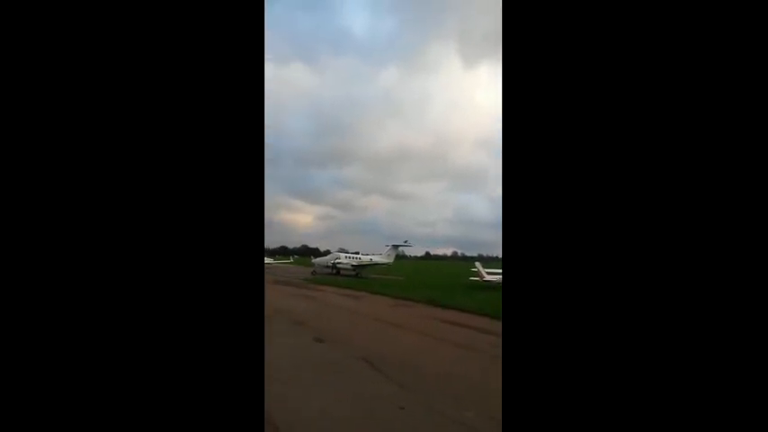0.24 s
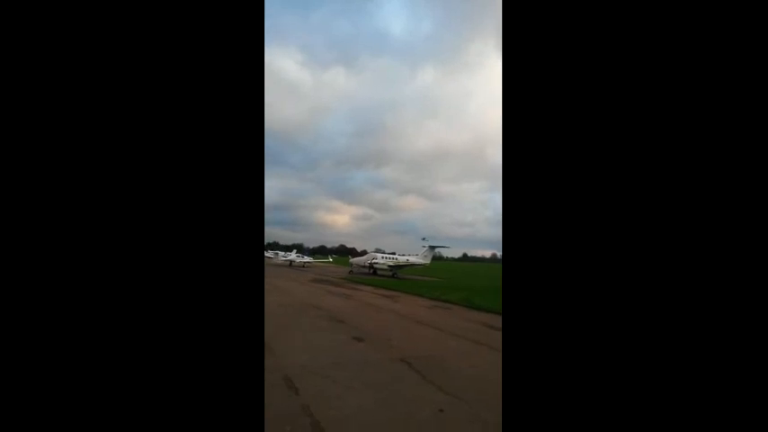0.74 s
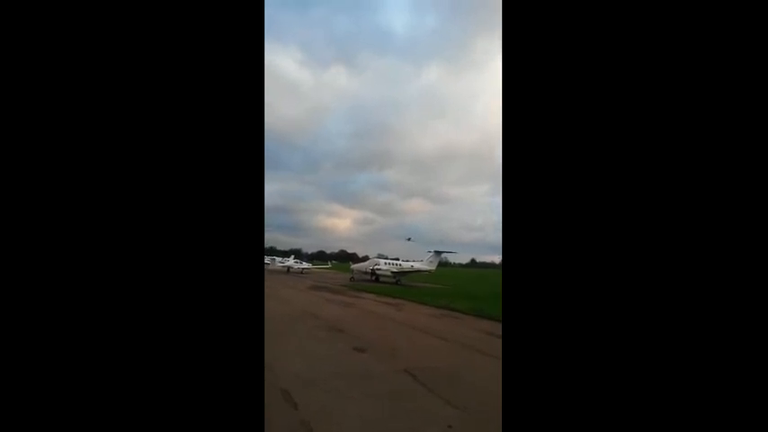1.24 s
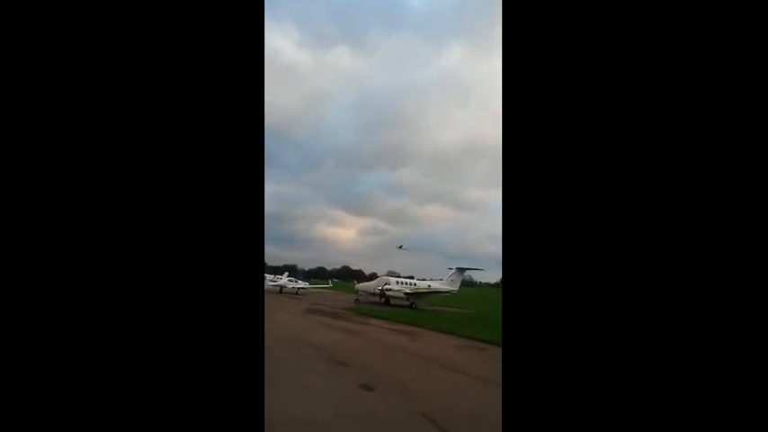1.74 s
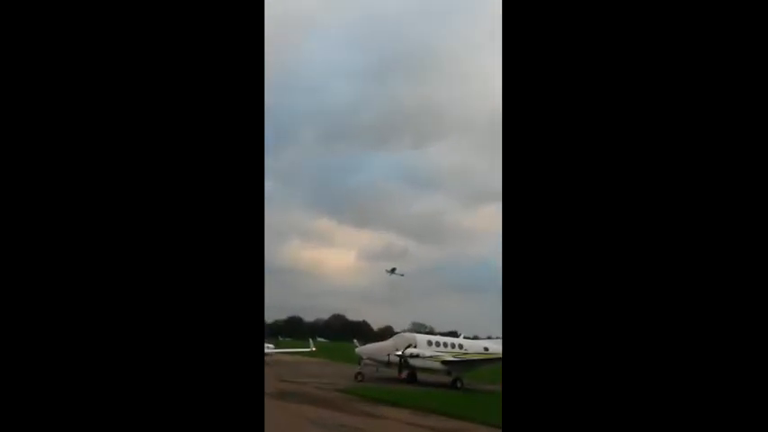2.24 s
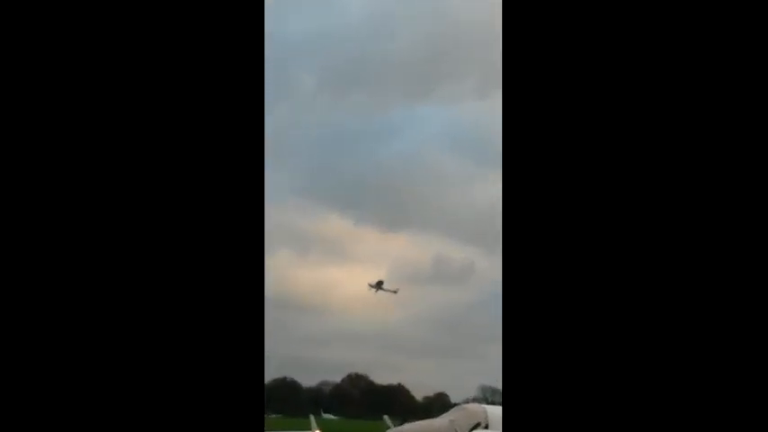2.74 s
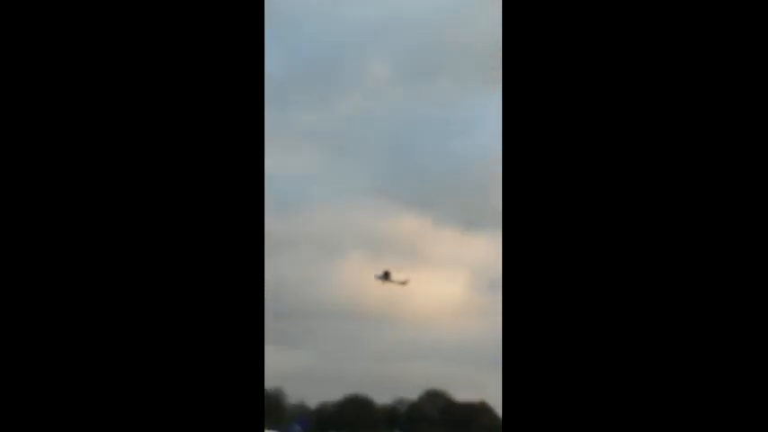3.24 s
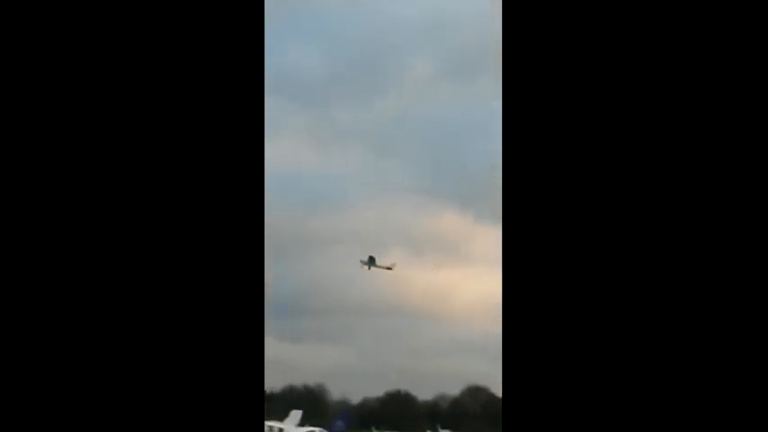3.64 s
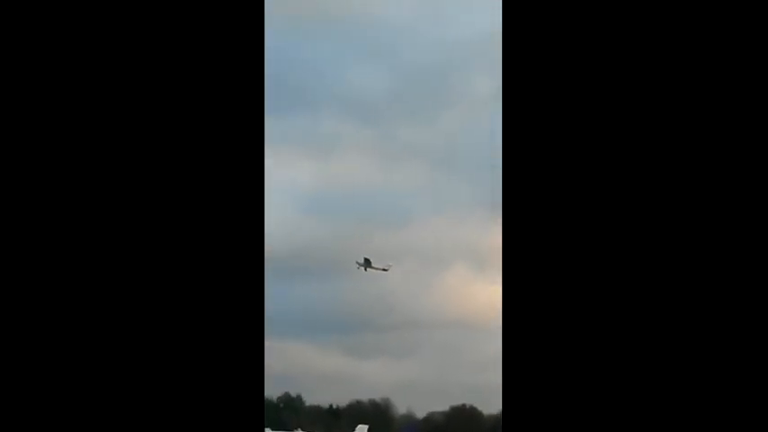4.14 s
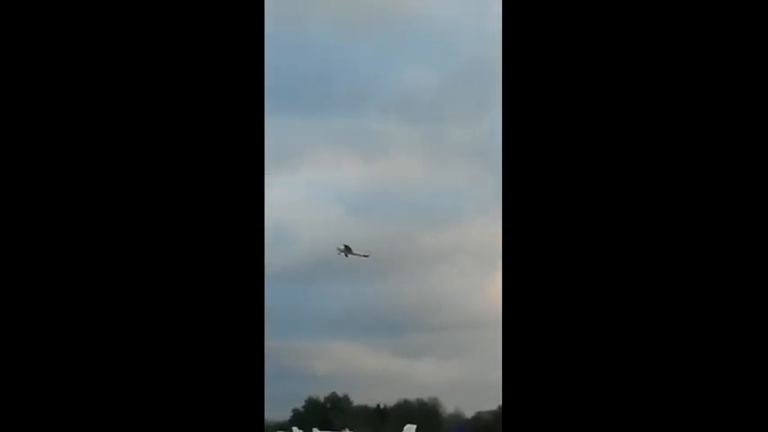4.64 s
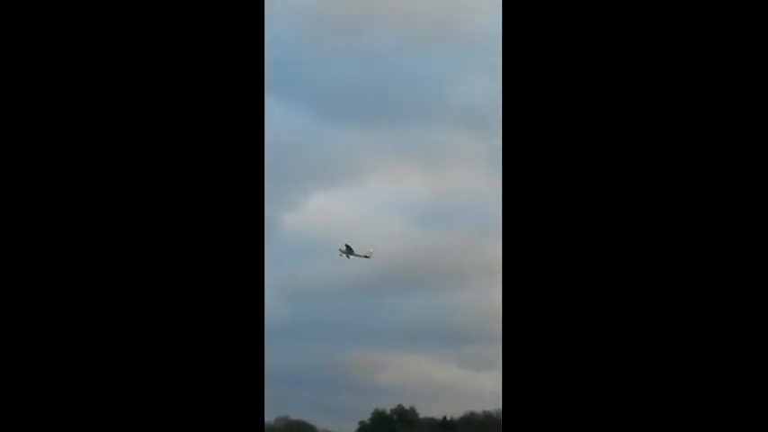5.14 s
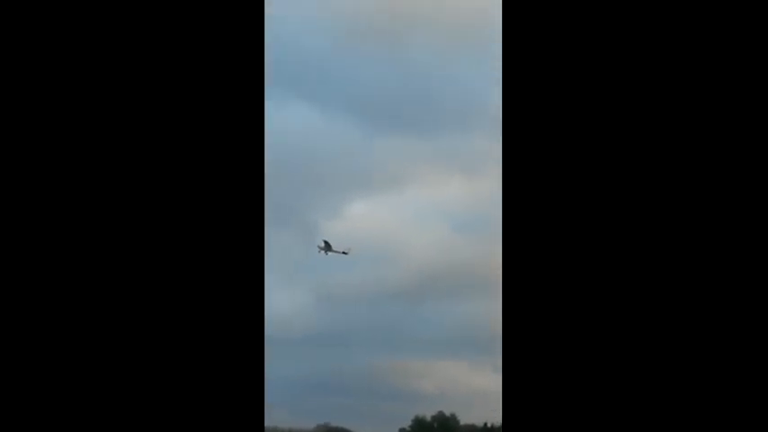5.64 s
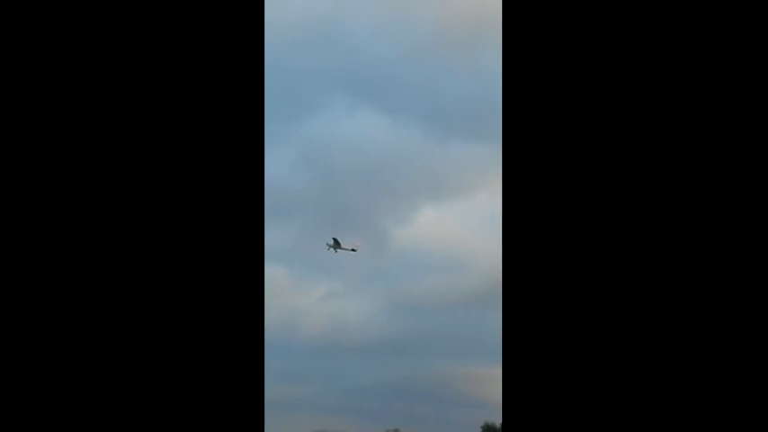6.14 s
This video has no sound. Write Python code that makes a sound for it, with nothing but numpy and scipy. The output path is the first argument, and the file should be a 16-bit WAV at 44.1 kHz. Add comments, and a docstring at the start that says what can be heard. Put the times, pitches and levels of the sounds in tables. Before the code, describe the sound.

A light propeller aeroplane drones closer over a windy airfield, its buzzing engine swelling and sinking slightly in pitch, with idling rumble and microphone ticks.

```python
"""Light aeroplane passing an airfield

A two-blade, four-cylinder aeroplane is heard at two ports as orders of one rotation, pulsing noise bands
and a ringing crack at each firing; its pitch sinks as it draws level.
Another engine idles on the ground as steady orders over rumble, beside a thin whine of filtered noise
and a faint top-treble noise that flickers about twelve times a second.
Wind puffs on the right port as low noise and decaying pops; a finger ticks there, ringing cavity and case.
A limiter ducks both channels ahead of the loudest peaks.
"""
import sys
import numpy as np
from scipy import signal
from scipy.fft import rfft, irfft, next_fast_len
from scipy.io import wavfile
from scipy.ndimage import uniform_filter1d, minimum_filter1d

SR = 44100
rng = np.random.default_rng(int(sys.argv[2]) if len(sys.argv) > 2 else 0)


def invert_db(x):
    """Field ratio 10**(x/20) for x, a level in decibels (scalar or array-like)."""
    u = np.asarray(x, float) / 20
    return 10 ** u


def int16_out(signal):
    """Quantize to a 16-bit WAV file."""
    q = np.round(np.clip(np.atleast_2d(signal).T, -1, 1) * 32767)
    wavfile.write(sys.argv[1], SR, q.astype(np.int16))


N = 282224
TIME_S = np.arange(N) / SR

# Blade and firing rate, sinking as the aeroplane draws level. Each row: time in seconds, rate in Hz.
FIRING_RATE = [(0.0, 84.63), (1.0, 84.77), (2.8, 82.58), (4.2, 81.66), (4.9, 81.2), (5.9, 79.65),
               (6.4, 79.04)]
# Orders above the third. Each row: multiple of the firing rate, relative level in dB far off,
# relative level in dB drawing level.
HIGHER_ORDERS = [(4, -7.5, -4.5), (5, -11, -7.5), (6, -4, -5), (7, -3, -4.5), (8, -10, -5.5), (9, -10, -8),
                 (10, -13, -11), (11, -17, -15), (12, -17, -16), (13, -20, -18), (14, -20, -16),
                 (15, -22, -17)]
# Quarter orders of unequal cylinders. Each row: quarters of the firing rate, dB relative to the higher orders.
QUARTER_ORDERS = [(5, -15), (7, -12), (9, -18), (10, -9.5), (11, -4), (13, -11), (17, -37)]
IDLE_CYCLE_HZ = 10.03
# Orders of the idling engine. Each row: multiple of the cycle, relative level in dB.
IDLE_ORDERS = [(4, -28), (7, -34), (12, 1), (13, -35), (14, -4.5), (15, -5.5), (16, -7), (20, -12),
               (27, -47), (30, -32), (31, -24), (33, -47), (52, -14)]
# Noise spectrum of the idling engine. Each row: frequency in Hz, relative density in dB per Hz.
RUMBLE_SPECTRUM = [(25, -14), (50, -7.5), (90, 1), (150, 6.5), (280, -7.5), (400, -7.5), (600, -51)]
# Noise spectrum of the aeroplane's roar. Each row: frequency in Hz, relative density in dB per Hz.
ROAR_SPECTRUM = [(200, -8.5), (300, -1), (400, -16.5), (560, -0.5), (800, -5.5), (1200, -3), (1500, -18.5),
                 (1900, -30)]
# Noise spectrum of its rasp. Each row: frequency in Hz, relative density in dB per Hz.
RASP_SPECTRUM = [(1100, 5), (1500, 4), (2000, 6.5), (2600, 4.5), (3200, -2.5), (4200, -5.5), (5500, -30)]
# Noise spectrum of its hiss. Each row: frequency in Hz, relative density in dB per Hz.
HISS_SPECTRUM = [(3000, -1.5), (4200, -5.5), (5500, 1), (6800, 1.5), (8100, 3), (9300, -6), (10500, -5.5),
                 (11600, -6.5), (12300, -22), (14500, -40)]
# Noise spectrum of the wind puffs. Each row: frequency in Hz, relative density in dB per Hz.
PUFF_SPECTRUM = [(15, -44), (25, -1.5), (140, 4), (226, -10.5), (271, -8), (515, -20), (785, -60),
                 (2000, -59), (2600, -79), (4400, -120)]
# Finger ticks at the right port. Each row: first touch in seconds, relative cavity drive in dB,
# relative case knock in dB.
TICKS = [(0.6627, -23.5, -50), (0.757, -31, -54), (0.7655, -24, -51), (0.768, -12, -41),
         (0.7693, -7.5, -38), (0.854, -22.5, -39), (0.9084, -5.5, -34), (0.941, -31.5, -45),
         (1.03, -18.5, -58), (3.2174, -27, -30.5), (3.218, -18, -38), (3.3641, -6.5, -28.5),
         (3.514, -5, -50), (3.522, -6, -36), (3.545, -39, -44), (3.9049, -18, -48)]
# Modes of the port cavity. Each row: frequency in Hz, relative level in dB, 60 dB decay time in seconds.
PORT_MODES = [(8130, 5, 0.0017), (13300, -22, 0.0009)]
# Likeness of the noise at the two ports. Each row: frequency in Hz, shared fraction of the power.
LIKENESS = [(60, 1), (500, .98), (1000, .74), (2000, .64), (4000, .6), (8000, .55), (12000, .6)]
# Level balance of the ports. Each row: frequency in Hz, left minus right in dB.
BALANCE_DB = [(60, -3.5), (140, -1), (350, -2), (850, -3.5), (2040, 3), (4940, 2.5), (11900, -2.5)]
# Phase difference of the ports. Each row: frequency in Hz, angle in radians (left ahead, save in crest()).
LEAD = [(60, -.06), (200, -.16), (950, -.3), (1800, 1.9), (2150, .8), (2500, -.8), (3200, -1.8), (3700, 0),
        (5000, 1.6), (6500, 2.1), (7200, .4), (8700, -2.1)]
# Band of the roar where direct and ground paths add up best. Each row: time in seconds, centre in Hz.
CREST_CENTRE = [(0.0, 998), (1.0, 988), (1.3, 818), (1.7, 990), (2.2, 1061), (3.56, 1048), (4.55, 950),
                (4.75, 842), (5.25, 812.3), (5.5, 1055), (6.0, 1200), (6.4, 1135)]
# Modes of the case. Each row: frequency in Hz, relative level in dB, 60 dB decay time in seconds.
CASE_MODES = [(6000, 4, 0.0022), (4170, 13.5, 0.0019), (2830, 13.5, 0.0022), (1700, 7.5, 0.0059),
              (1200, 7, 0.02)]
# Eddies that pop on the right port. Each row: start in seconds, relative level in dB, frequency in Hz.
POPS = [(0.838, -22, 172), (0.868, -11, 191), (0.879, -9.5, 176), (1.146, -11, 183), (1.172, -16, 260),
        (1.204, -5, 392), (1.212, -10, 171), (1.2295, -15, 950), (1.23, -8, 330), (1.245, -17, 260),
        (1.25, -10.5, 150), (1.266, -19, 139), (1.275, -16, 700), (1.28, -12, 303), (1.18, -22, 400),
        (1.306, -13.5, 277), (1.319, -11.5, 477), (1.408, -25, 189), (1.413, -18, 513), (1.415, -10, 343),
        (1.429, -20, 149), (1.442, -14, 260), (1.454, -19, 200), (1.547, -17.5, 220), (1.698, -17.5, 170),
        (1.719, -26, 188), (2.204, -14, 268), (2.518, -25, 301)]
# Common swell of the steady noise. Each row: time in seconds, reference level in dB.
SWELL = [(0.0, -55.5), (0.36, -57), (0.66, -54), (0.87, -50), (1.0, -53.5), (1.55, -58), (1.76, -57.5),
         (2.03, -50), (2.3, -45.5), (3.14, -47), (3.55, -50.5), (4.33, -52.5), (4.83, -48), (5.67, -46),
         (5.9, -45), (6.4, -47.5)]
# Pulses reaching the ports. Each row: time in seconds, blade level in dB, exhaust level in dB.
PULSES = [(0.0, -39.5, -35.5), (.32, -40.5, -34.5), (.55, -38, -34.5), (.82, -36.5, -31.5),
          (1.12, -40, -46), (1.44, -40.5, -38), (1.7, -43.5, -37), (1.95, -32, -35.5), (2.24, -27.5, -33.5),
          (2.4, -28, -35), (2.56, -26, -34), (2.72, -25.5, -31), (3.04, -25, -29.5), (3.2, -23, -27.5),
          (3.36, -24.5, -27.5), (3.68, -32.5, -42.5), (3.84, -33.5, -35.5), (4.0, -34.5, -41.5),
          (4.16, -43, -31), (4.32, -40, -33.5), (4.64, -38.5, -17.5), (4.8, -29, -20.5), (4.96, -31, -15.5),
          (5.12, -26.5, -18), (5.28, -25, -24.5), (5.44, -24.5, -28.5), (5.6, -25, -23), (5.76, -21, -22.5),
          (6.0, -23, -20.5), (6.4, -22, -20.5)]
# The three lowest orders. Each row: dB relative to the blade pulse, dB relative to the exhaust pulse.
LOWEST_ORDERS = [(-0.5, -16), (-20, -1), (-14.5, -15.5)]
# Brief swells and fades of the third order. Each row: middle in seconds, length in seconds, change in dB.
THIRD_SWAYS = [(.55, 0.31, -6.5), (1.847, 0.18, -11), (2.657, 0.15, 3.5), (4.243, 0.56, 9.5),
               (4.901, 0.39, -5.5), (5.53, 0.45, 5.5), (6.35, 0.32, -3.5)]
# Brief flares of the noise. Each row: middle in seconds, length in seconds, roar rise in dB, rasp rise in dB.
FLARES = [(0.023, 0.33, 4, 5), (0.28, 0.11, 1, 3), (0.71, 0.13, 4, 3), (1.27, 0.12, 5, 3),
          (1.707, 0.061, 2, 4.5), (2.17, 0.12, 1, 5), (2.569, 0.098, 1.5, 2.5), (2.962, 0.16, 2, 1.3),
          (3.527, 0.36, 4.5, 1.5), (4.17, 0.51, 5.5, 1.5), (4.414, 0.25, 1, 4), (4.637, 0.17, 4.5, 0.3),
          (4.976, 0.22, 3.5, 3), (5.81, 0.36, 2.5, 3), (6.039, 0.17, 0, 0)]
# Wind puffs on the right port. Each row: middle in seconds, length in seconds, level in dB.
PUFFS = [(0.5, 0.044, -38), (0.576, 0.038, -44), (0.693, 0.043, -32), (0.853, 0.054, -22),
         (0.944, 0.027, -30), (1.05, 0.054, -37), (1.16, 0.082, -28), (1.237, 0.068, -16),
         (1.336, 0.028, -19.5), (1.41, 0.034, -28), (1.428, 0.034, -14), (1.547, 0.017, -23),
         (1.712, 0.045, -24.5), (1.85, 0.18, -34), (2.02, 0.032, -28), (2.189, 0.17, -21.5),
         (2.52, 0.04, -29), (3.203, 0.11, -25.5), (3.882, 0.1, -41), (4.13, 0.056, -30),
         (4.242, 0.051, -24), (4.418, 0.32, -34)]
# Modes of the exhaust stubs. Each row: frequency in Hz, relative level in dB, 60 dB decay time in seconds.
STUB_MODES = [(2430, -5.5, 0.016), (1710, -2, 0.032), (1203, -7, 0.046), (3080, -7.5, 0.029)]
# Phase common to the whole orders, which turns a downward spike into a steep rise and slower fall.
# Each row: time in seconds, phase in radians.
SKEW = [(0, -2.8), (2.6, -2.5), (3.3, -1.5), (5.3, -1.45), (6.4, -1.0)]
# Band where the exhaust growl is strongest. Each row: time in seconds, centre in Hz, rise in dB.
GROWL = [(0, 580, -5.5), (1.5, 563.7, 2.5), (2.2, 559.4, 2), (3.0, 579, 2.5), (3.5, 580, -7),
         (4.2, 564, -5), (4.5, 933, -1), (4.7, 643, -2), (4.93, 822, 10), (5.08, 637, -2), (5.25, 522.3, 9),
         (5.5, 572.5, 7), (5.65, 598, -1.5), (5.8, 665, 9), (5.95, 623, -0.5), (6.1, 502, 3),
         (6.27, 555, 0), (6.4, 547, -7)]
# Runs of firings whose crack stands out in one colour. Each row: middle in seconds, length in seconds,
# frequency in Hz, drive relative to the rasp in dB.
CRACK_RUNS = [(0.063, .1, 2190, 7), (.29, .07, 2300, 5), (0.722, 0.14, 1160, 8), (2.18, .12, 1140, 17),
              (2.601, 0.16, 1110, 6), (2.95, 0.19, 1170, 9), (3.25, .15, 1170, 8), (3.462, 0.05, 960, 13),
              (4.93, 0.056, 1370, 11), (4.597, .12, 2350, -4), (4.82, 0.057, 2240, 10),
              (4.95, 0.15, 2450, -5), (5.05, 0.078, 2150, 9), (5.152, 0.06, 2600, 11),
              (5.229, .07, 2160, 10), (5.256, .09, 2620, 8.5), (5.39, 0.088, 3250, 9),
              (5.39, 0.076, 2180, 7), (5.457, 0.054, 2467, 10), (5.76, 0.079, 2395, 6),
              (5.818, .07, 3120, -2), (5.87, 0.082, 1200, 0), (5.926, 0.057, 2900, 8),
              (5.973, 0.06, 2550, 9), (6.049, 0.051, 2770, 12), (6.038, 0.17, 1220, 10),
              (6.102, 0.045, 2450, -6)]
# Sprays of tiny catches as the fingertip slides. Each row: middle in seconds, length in seconds,
# relative drive in dB.
RUBS = [(0.656, 0.011, -45), (0.757, 0.018, -36), (0.766, .005, -31), (0.855, .01, -41), (3.192, .004, -38),
        (3.521, 0.0058, -40)]

MEAN_PULSE_DB, MEAN_SWELL_DB = -30, -52   # the shares below act about these
# Upper orders follow the pulses and gain as the aeroplane nears.
HIGHER_DB, HIGHER_FOLLOWS, BRIGHTENS_DB_PER_S = -49.5, 0.75, 0.71
# Noise laws: base level in dB at the start, share of the swell, share of the exhaust, trend in dB per second.
ROAR_LAW, RASP_LAW, HISS_LAW = (-44.5, 0.94, 0.0457, 0.1234), (-43.5, 0.63, 0.2652, -0.02), (-42.5, 0.57, 0.2249, 0.22)
IDLE_LAW, WHINE_LAW = (-41.5, 0.99, 0.05, 0.15), (-44, 1.32, 0.04, -1.63)
CALM_DB = -48   # wind between the puffs
BEAT_AT_START, BEAT_PER_S, BEAT_SHARP = 0.4, .13, 0.35   # relative pulsing depth, its growth, second harmonic
UPPER_CREST, UPPER_CREST_DB = 2.3, -12   # second band: multiple of the first, dB relative to the rasp
WHISTLE_DB, WHISTLE_DB_PER_S = -7.5, -1.5   # relative to the whine
BAND_HIGH_HZ, BAND_LOW_HZ, SLIDE_FROM_S, SLIDE_S = 8190, 7800, 2.5, 0.6   # right hiss band moves down
DRAWS_LEVEL_FROM_S, DRAWS_LEVEL_S = 3.8, 1.2
POP_CYCLES, POP_RISE_S, POP_CUT_HZ = 1.0, 0.0011, 67   # decay, rise, high-pass
FLICKER_DB, FLICKER_FOLLOWS = -54, .8   # before its pulsing; share of the idling level's swing
CRACK_DB, CRACK_DB_PER_S, CRACK_FLARES = 2.5, -1, 2   # drive over the rasp, its trend, share of the rasp's flares
CRACK_SPREAD_DB, RUN_SPREAD_DB, RUN_T60_S = 2.8, 1.5, .016   # spread from firing to firing; ring time of a run
STEADY_TOP_HZ, TICK_TOP_HZ = 12900, 14800   # low-pass limits of the steady sound and of the ticks
# Growl: width among the orders, noise in the same band relative to the roar, width of that noise.
GROWL_OCTAVES, GROWL_NOISE_DB, GROWL_WIDTH_HZ = 0.36, -10, 270
CREST_APART = 0.13   # power share of the band that differs at the two ports
RUB_PER_S = 2500   # mean rate of catches
FIRING_JITTER_RAD, ORDER_FLICKER_DB = .05, 1.8   # firings a little early or late; upper orders break up
PORT_BUILD_HZ = 1900   # resonance width; a narrow throat makes the ring build over a few cycles


def column(rows, k):
    """One quantity of a table as an array."""
    return np.array(rows)[:, k]


def rms_one(x):
    """Normalisation of the signal power to rms 1."""
    return x / np.sqrt(np.mean(x ** 2) + 1e-20)


def in_time(rows):
    """Linear interpolation in time: each column of a table as a value per sample."""
    s, *columns = np.transpose(rows)
    return [np.interp(TIME_S, s, c) for c in columns]


def at_hz(points, hz):
    """Interpolation of a spectrum along a logarithmic frequency axis."""
    return np.interp(np.log(hz), np.log(column(points, 0) + 1), column(points, 1))


def bells(rows, heights):
    """Sum of Gaussian envelopes, each at half height across its length."""
    t = np.arange(0, N + 64, 64) / SR
    shape = sum(h * 2. ** -(2 * (t - s) / long_s) ** 2 for (s, long_s, *_), h in zip(rows, heights))
    return np.interp(TIME_S, t, shape)


def drift(rate):
    """Slow random modulation of rms 1: white noise through two equal poles, at a fortieth of the sample rate."""
    r = np.exp(-80 * np.pi * rate / SR)
    slow = signal.lfilter([1], [1, -2 * r, r * r], rng.standard_normal(N // 40 + 2002))[2000:]
    return np.interp(np.arange(N) / 40, np.arange(len(slow)), rms_one(slow))


def sides(hz):
    """Level difference between the channels: gains of the left and right ports at one frequency."""
    return invert_db([[0], [-at_hz(BALANCE_DB, hz)]])


def bandpass(low_hz, high_hz, x):
    """Band limitation by a Butterworth filter."""
    return signal.sosfilt(signal.butter(2, [low_hz, high_hz], "band", fs=SR, output="sos"), x)


def noise(spectrum, patchy_db, patch_rate):
    """Partly coherent stereo noise in flickering third octaves, with rms 1 on the left."""
    out, together = 0, drift(patch_rate)
    low_hz, top_hz = spectrum[0][0], min(spectrum[-1][0], 16000)
    edges = low_hz * 2 ** np.arange(0, np.log2(top_hz / low_hz), 1 / 3)
    shared, own = rng.standard_normal((2, 2, N))
    turned = irfft(1j * rfft(shared, next_fast_len(N)))[:, :N]   # a quarter cycle ahead at every frequency
    for k, (low, high) in enumerate(zip(edges, edges[1:])):
        mid, ahead, side = bandpass(low, high, [shared[k % 2], turned[k % 2], own[k % 2]])
        hz = np.sqrt(low * high)
        alike, lead = at_hz(LIKENESS, hz), at_hz(LEAD, hz)
        common = np.array([np.cos(lead) * mid + np.sin(lead) * ahead, mid])
        apart = np.array([side, np.roll(side, N // 2)])
        gain = invert_db(at_hz(spectrum, hz) + patchy_db * (together + drift(patch_rate)))
        out = out + gain * sides(hz) * (np.sqrt(alike) * common + np.sqrt(1 - alike) * apart)
    return out / np.std(out[0])


def tone(phase, hz, level_db, waver_db, waver_rad):
    """Propagation in turbulent air: a sine wavers in level and in phase, the phase a little apart at the ports."""
    apart = 0.012 * np.sqrt(hz / 100) * drift(4.4) * [[1], [-1]] + at_hz(LEAD, hz) * np.array([[1], [0]])
    waver = waver_db * (0.55 * drift(31.0) + 1.35 * drift(1.45)) - waver_db ** 2 / 9.5
    gain = np.sqrt(2) * invert_db(level_db + waver)
    return gain * sides(hz) * np.cos(phase + waver_rad * drift(4.6) + apart)


def peak(x, hz, width_hz):
    """Second-order resonance with a gain near 1 at its top."""
    r = np.exp(-np.pi * width_hz / SR)
    b = np.array([1, 0, -1]) * (1 - r * r) / 2
    return signal.lfilter(b, [1, -2 * r * np.cos(2 * np.pi * hz / SR), r * r], x)


def ring(clicks, modes):
    """Modal synthesis: impulses set exponentially decaying sines ringing."""
    out = 0
    for hz, level_db, t60 in modes:
        r, w = invert_db(-60 / (t60 * SR)), 2 * np.pi * hz / SR
        mode = signal.lfilter([0, np.sin(w)], [1, -2 * r * np.cos(w), r * r], clicks + 1e-18)
        out = out + invert_db(level_db) * mode
    return out


def layer_db(law):
    """Superposition in decibels of the common swell, the exhaust pulse and a steady trend."""
    start_db, swell_share, exhaust_share, db_per_s = law
    (swell_db,), exhaust_db = in_time(SWELL), in_time(PULSES)[-1]
    follows_db = swell_share * (swell_db - MEAN_SWELL_DB) + exhaust_share * (exhaust_db - MEAN_PULSE_DB)
    return start_db + follows_db + db_per_s * TIME_S


def treble_flicker():
    """Amplitude modulation: a separate faint top-treble noise flickers about twelve times a second."""
    level_db = layer_db(IDLE_LAW)
    top = bandpass(10900, 11800, rng.standard_normal((2, N)))
    phase = 2 * np.pi * np.cumsum(11.9 + .4 * drift(1.5)) / SR
    pulses = np.maximum(np.cos(phase), 0) * invert_db(3 * drift(4))
    return invert_db(FLICKER_DB + FLICKER_FOLLOWS * (level_db - level_db.mean())) * pulses * rms_one(top)


def idling_engine():
    """Periodic combustion: steady orders of a slow cycle over rumble."""
    level_db = layer_db(IDLE_LAW)
    out = invert_db(level_db + 0.5) * noise(RUMBLE_SPECTRUM, patchy_db=1.0, patch_rate=2.7)
    for k, order_db in IDLE_ORDERS:
        hz = round(k) * IDLE_CYCLE_HZ
        out = out + tone(2 * np.pi * hz * TIME_S + k * k, hz, level_db + order_db, 0.91, 0.43)
    return out


def whine():
    """Resonant filtering: a thin whistle with hiss about an octave up, placed by each port's cavity."""
    white = rng.standard_normal((2, 2, N))
    whistle = bandpass(3990, 4230, white[0])
    left = peak(peak(white[1, 0], 7730, 1060), 4670, 1900)
    slid = np.clip((TIME_S - SLIDE_FROM_S) / SLIDE_S, 0, 1)
    high, low = (peak(peak(white[1, 1], hz, 1300), hz, 1350) for hz in (BAND_HIGH_HZ, BAND_LOW_HZ))
    right = (1 - slid) * high + slid * low
    band = np.array([invert_db(-0.33) * rms_one(left), invert_db(2.43) * rms_one(right)])
    whistle_db = WHISTLE_DB + WHISTLE_DB_PER_S * TIME_S + 1.2 * drift(5.7)
    return invert_db(layer_db(WHINE_LAW)) * (invert_db(2.76 * drift(77.0)) * band + invert_db(whistle_db) * rms_one(whistle))


def wind():
    """Turbulent pressure: low eddy noise, evened in strength, and decaying pops on the right port alone."""
    level_db = 10 * np.log10(invert_db(2 * CALM_DB) + bells(PUFFS, invert_db(2 * column(PUFFS, 2))))   # powers add
    right = noise(PUFF_SPECTRUM, patchy_db=4.0, patch_rate=6.3)[0]
    right = rms_one(right / (uniform_filter1d(right ** 2, size=1300) + .1) ** .4)
    pops, t = np.zeros(N), np.arange(1500) / SR
    for s, peak_db, hz in POPS:
        at = round(s * SR)
        envelope = np.exp(-t * hz / POP_CYCLES) * -np.expm1(-t / POP_RISE_S)
        pops[at:at + len(t)] += invert_db(peak_db + 5.5) * np.sin(2 * np.pi * hz * t) * envelope
    pops = signal.sosfilt(signal.butter(2, POP_CUT_HZ, "high", fs=SR, output="sos"), pops)
    return np.array([np.zeros(N), invert_db(level_db) * right + pops])


def ticks():
    """Impulse excitation: each tick rings the port cavity and knocks the case, both reaching the left more weakly."""
    at = (column(TICKS, 0) * SR).astype(int) + 24   # contact peaks just after the first touch
    touch, knock = np.zeros(N), np.zeros(N)
    touch[at], knock[at] = invert_db(column(TICKS, 1) + 12), invert_db(column(TICKS, 2))
    catches = (rng.random(N) < RUB_PER_S / SR) * rng.standard_normal(N)
    touch += catches * bells(RUBS, invert_db(column(RUBS, 2) + 12))
    cavity = sum(peak(ring(touch, [mode]), mode[0], PORT_BUILD_HZ) for mode in PORT_MODES)
    return cavity * invert_db([[-27], [0.5]]) + ring(knock, CASE_MODES) * invert_db([[-6], [1.5]])


def crest(hz, width_hz):
    """Quadrature modulation: slow noise carried to a band whose centre wanders, rms 1 before port balance."""
    slow = signal.sosfilt(signal.butter(2, width_hz / 2, fs=SR, output="sos"), rng.standard_normal((3, 2, N)))
    slow = np.sqrt(1 - CREST_APART) * slow[0][:, None] + np.sqrt(CREST_APART) * slow[1:].swapaxes(0, 1)
    # the left carrier is turned back by the port angle
    turn = 2 * np.pi * np.cumsum(hz) / SR - at_hz(LEAD, hz.mean()) * np.array([[1], [0]])
    return sides(hz.mean()) * rms_one(slow[0] * np.cos(turn) + slow[1] * np.sin(turn))


def cracks(turn, rasp_db, stub_db):
    """Impulsive exhaust: one click a firing, of random strength in each stub mode and each coloured run."""
    fires = np.flatnonzero(np.diff(np.floor(turn / (2 * np.pi) + .06)))
    voices = [(mode, invert_db(stub_db[fires]), CRACK_SPREAD_DB) for mode in STUB_MODES]
    for row in CRACK_RUNS:
        size = invert_db(rasp_db[fires]) * bells([row], [1])[fires]
        voices.append(((row[2], row[3], RUN_T60_S), size, RUN_SPREAD_DB))
    out = 0
    for mode, size, spread_db in voices:
        hz = mode[0]
        clicks = np.zeros((2, N + 40))
        size = size * invert_db(spread_db * rng.standard_normal(len(fires)))
        lead_samples = round(at_hz(LEAD, hz) / (2 * np.pi * hz) * SR)
        clicks[0, fires - lead_samples], clicks[1, fires] = size, size
        out = out - sides(hz) * ring(clicks[:, :N], [mode])
    return out


def low_orders(turn, mean_hz, skew, blade_db, exhaust_db):
    """Harmonic addition: blade and exhaust amplitudes sum in each of the three lowest orders."""
    out = 0
    for k, (b_db, e_db) in enumerate(LOWEST_ORDERS, 1):
        level_db = 20 * np.log10(invert_db(blade_db + b_db) + invert_db(exhaust_db + e_db))
        if k == 3:
            level_db = level_db + bells(THIRD_SWAYS, column(THIRD_SWAYS, 2))
        out = out + tone(k * turn + skew, k * mean_hz, level_db, .6, .08 * k)
    return out


def upper_orders(turn, hz, skew, higher_db):
    """Formant shaping: the growl band lifts or lowers whole orders; quarter orders come of unequal cylinders."""
    out, mean_hz = 0, hz.mean()
    growl_hz, growl_db = in_time(GROWL)
    near = np.clip((TIME_S - DRAWS_LEVEL_FROM_S) / DRAWS_LEVEL_S, 0, 1)
    for k, far_db, near_db in HIGHER_ORDERS:
        favoured_db = growl_db * 2. ** -(2 * np.log2(k * hz / growl_hz) / GROWL_OCTAVES) ** 2
        order_db = far_db + near * (near_db - far_db) + ORDER_FLICKER_DB * drift(9)
        out = out + tone(k * turn + skew, k * mean_hz, higher_db + favoured_db + order_db, 1.2, .045 * k)
    for k, level_db in QUARTER_ORDERS:
        out = out + tone(k * turn / 4 + k * k, k * mean_hz / 4, higher_db + level_db, 0.3, 0.8)
    return out


def pulsing_noise(turn, roar_db, rasp_db, hiss_db):
    """Amplitude modulation: roar, rasp and hiss swell with every pulse, more deeply as time goes on."""
    (roar_hz,), (growl_hz, growl_db) = in_time(CREST_CENTRE), in_time(GROWL)
    depth = BEAT_AT_START + BEAT_PER_S * TIME_S
    beat = depth * (np.cos(turn - .3) + BEAT_SHARP * np.cos(2 * turn - .6))
    out = invert_db(roar_db - .7 + 3.0 * beat) * noise(ROAR_SPECTRUM, patchy_db=.9, patch_rate=6)
    out = out + invert_db(roar_db + GROWL_NOISE_DB + growl_db + 0.91 * beat) * crest(growl_hz, GROWL_WIDTH_HZ)
    out = out + invert_db(roar_db - 5.5 + 1.7 * beat) * crest(roar_hz, 315)
    out = out + invert_db(rasp_db - .4 + 1.6 * beat) * noise(RASP_SPECTRUM, patchy_db=1.5, patch_rate=12)
    out = out + invert_db(rasp_db + UPPER_CREST_DB + 3.9 * beat) * crest(UPPER_CREST * roar_hz, 1200)
    return out + invert_db(hiss_db - 4 + 0.51 * beat) * noise(HISS_SPECTRUM, patchy_db=1.57, patch_rate=126.0)


def aeroplane():
    """Common rotation: one phase drives the orders, the cracks and the pulsing noise."""
    (hz,), (skew,) = in_time(FIRING_RATE), in_time(SKEW)
    turn = 2 * np.pi * np.cumsum(hz * (1 + 0.001004 * drift(3.57))) / SR
    blade_db, exhaust_db = in_time(PULSES)
    roar_flare_db, rasp_flare_db = (bells(FLARES, column(FLARES, k)) for k in (2, 3))
    out = low_orders(turn, hz.mean(), skew, blade_db, exhaust_db)
    turn = turn + FIRING_JITTER_RAD * drift(12)
    pulse_db = (blade_db + exhaust_db) / 2 - MEAN_PULSE_DB
    higher_db = HIGHER_DB + HIGHER_FOLLOWS * pulse_db + BRIGHTENS_DB_PER_S * TIME_S + 0.81 * roar_flare_db
    out = out + upper_orders(turn, hz, skew, higher_db)
    roar_db, rasp_db, hiss_db = map(layer_db, [ROAR_LAW, RASP_LAW, HISS_LAW])
    stub_db = rasp_db + CRACK_DB + CRACK_DB_PER_S * TIME_S + CRACK_FLARES * rasp_flare_db
    out = out + cracks(turn, rasp_db, stub_db)
    return out + pulsing_noise(turn, roar_db + roar_flare_db, rasp_db + rasp_flare_db, hiss_db)


def scene():
    """Linear superposition: sum of all sources, the steady ones and the ticks low-passed."""
    steady = treble_flicker() + idling_engine() + whine() + aeroplane()
    steady = signal.sosfilt(signal.cheby2(18, 70, STEADY_TOP_HZ, fs=SR, output="sos"), steady)
    tapped = signal.sosfilt(signal.butter(8, TICK_TOP_HZ, fs=SR, output="sos"), ticks())
    return steady + wind() + tapped


def limiter(x, ceiling_db, ahead_s, release_db_per_s):
    """Look-ahead gain control: both channels duck ahead of a peak and recover at a steady rate in decibels."""
    ahead, ramp = int(ahead_s * SR), release_db_per_s * TIME_S
    over_db = np.maximum(20 * np.log10(np.abs(x).max(axis=0) + 1e-9) - ceiling_db, 0)
    held_db = np.maximum.accumulate(over_db + ramp) - ramp
    early_db = -minimum_filter1d(-held_db, size=2 * ahead + 1)
    return x * invert_db(-uniform_filter1d(early_db, size=ahead))


def low_pass(x):
    """Removes everything above the highest recorded frequency."""
    return signal.sosfilt(signal.butter(12, 17000, fs=SR, output="sos"), x)


def record(dry):
    """High-pass filtering of the deep bass without phase shift, then limiting of the peaks."""
    x = signal.sosfiltfilt(signal.butter(2, 36, "high", fs=SR, output="sos"), dry)
    x = limiter(x, ceiling_db=-0.5, ahead_s=0.014, release_db_per_s=450)
    return low_pass(x)


dry = scene()
out = record(dry)
int16_out(out)
```